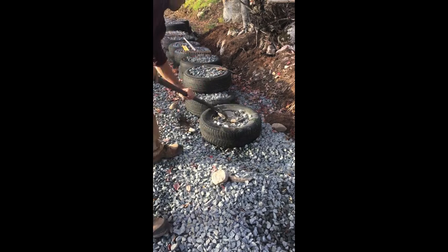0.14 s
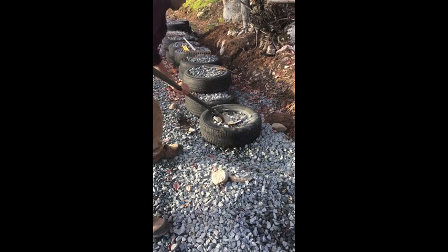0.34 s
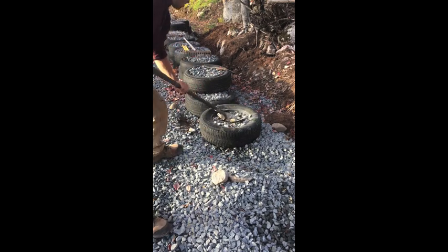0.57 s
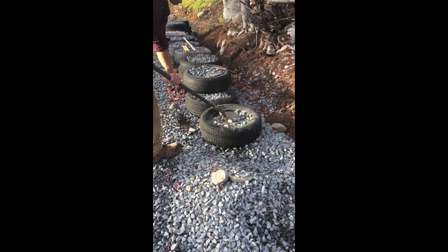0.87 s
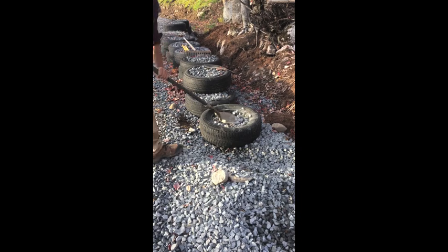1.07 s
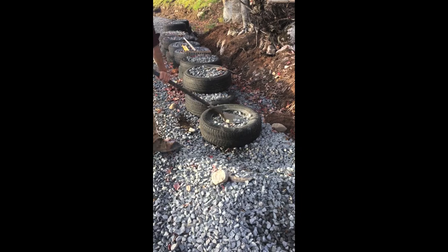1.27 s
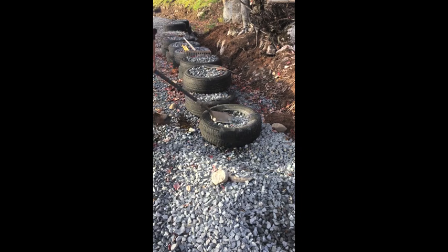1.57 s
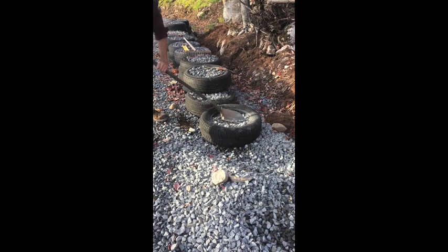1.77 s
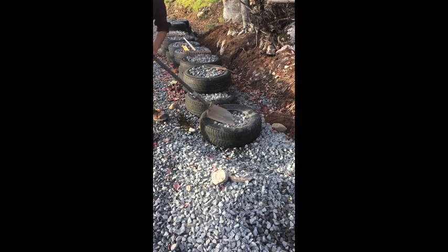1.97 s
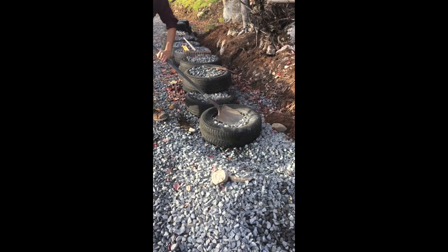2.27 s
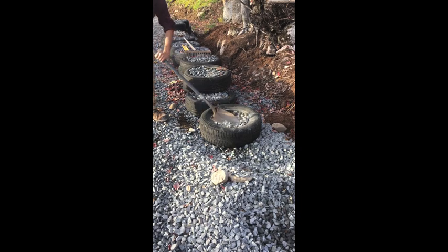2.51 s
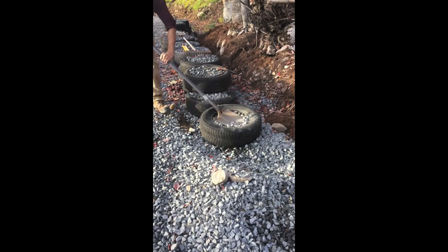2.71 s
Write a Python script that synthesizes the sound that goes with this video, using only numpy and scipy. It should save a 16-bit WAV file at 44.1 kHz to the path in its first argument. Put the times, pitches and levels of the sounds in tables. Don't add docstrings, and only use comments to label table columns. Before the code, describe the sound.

A steel shovel crunches into crushed stone packed in a tire, in uneven pushes with sharp stone cracks, trickling grit, brief metallic ringing and dull rubber thuds; close phone microphone, outdoors, short faint echo.

```python
import sys
import numpy as np
from scipy import signal
from scipy.fft import rfft, irfft, next_fast_len
from scipy.io import wavfile
from scipy.ndimage import uniform_filter1d, map_coordinates

SR = 44100
rng = np.random.default_rng(int(sys.argv[2]) if len(sys.argv) > 2 else 0)


def how_loud(loudness_db):
    steps = np.asarray(loudness_db, float) / 20
    return 10 ** steps


def dump_mix(stems):
    frames = np.atleast_2d(stems).T
    limited = np.clip(frames, -1, 1)
    pcm = np.round(limited * 32767).astype(np.int16)
    wavfile.write(sys.argv[1], SR, pcm)


N = 125685

# time in seconds, ring of the buried pan in dB, boom of the tire in dB.
BLADE_DEPTH = [(0, 0.5, -9), (.2, -1.5, 3), (.4, -8, -14), (.58, 2.5, 1.5), (.75, -12, -6),
               (1.0, -0.5, -1.5), (1.38, 1.5, 3.5), (1.65, 0, -1.5), (1.82, 12, 7), (2.06, 3, -7),
               (2.27, 9, 3.5), (2.5, 7.5, -2), (2.85, 9.5, 8)]


def unit(x):
    return x / np.sqrt(np.mean(x ** 2) + 1e-20)


def along(points, hz):
    f, v = np.transpose(points)
    return np.interp(np.log(hz + 1), np.log(f + 1), v)


def curves(rows):
    s, *cols = np.transpose(rows)
    return [np.interp(np.arange(N) / SR, s, c) for c in cols]


def wobble(rate):
    knots = rng.standard_normal(int(N * rate / SR) + 4)
    return map_coordinates(knots, [np.arange(N) * rate / SR])


def filtered(x, response):
    m = next_fast_len(N + SR // 2)
    return irfft(rfft(x, m) * response(np.fft.rfftfreq(m, 1 / SR)), m)[:N]


def ringing(x, modes):
    def bank(f):
        total = 0
        for k, (center, width, db) in enumerate(modes):
            damping = 1j * f * width
            total = total + (-1) ** k * how_loud(db) * damping / (center * center - f * f + damping)
        return total

    return unit(filtered(x, bank)) * np.sqrt(np.mean(x ** 2))


def noise(spectrum, patchy_db):
    z = signal.stft(rng.standard_normal(N + 512), nperseg=256)[2]
    field = uniform_filter1d(rng.standard_normal(z.shape), 5, 0)
    field = uniform_filter1d(field, 4, 1)
    x = signal.istft(z * how_loud(patchy_db * unit(field)), nperseg=256)[1][:N]
    return unit(filtered(x, lambda hz: how_loud(along(spectrum, hz))))


def open_air():
    # frequency in Hz, level in dB.
    air_spectrum = [(25, 12), (65, 11), (200, 4), (500, -1.5), (1400, -28), (5000, -4), (11000, -4),
                    (16000, -27)]
    return how_loud(-52.5) * noise(air_spectrum, patchy_db=2.5)


def force():
    # time in seconds, level in dB.
    trickle = [(0, -33.5), (.09, -37), (.25, -32.5), (.49, -33.5), (.7, -35), (.83, -34.5), (1.06, -37.5),
               (1.12, -28.5), (1.26, -31.5), (1.3, -40), (1.5, -46), (1.55, -31.5), (1.88, -24.5),
               (1.94, -48), (2.0, -36.5), (2.38, -41), (2.46, -28.5), (2.85, -38)]
    # peak in seconds, rise in seconds, fall in seconds, level in dB.
    pushes = [(.17, 0.037, 0.054, -21.5), (.572, .04, .03, -16), (0.674, 0.015, 0.012, -27),
              (0.794, 0.038, 0.013, -27.5), (0.863, 0.018, 0.014, -19), (.97, 0.064, 0.035, -14.5),
              (1.373, 0.05, 0.049, -20.5), (1.7, 0.097, .04, -30.5), (1.771, 0.017, 0.02, -16),
              (1.86, .03, 0.017, -32), (2.094, 0.042, 0.062, -21.5), (2.268, 0.053, 0.055, -17.5),
              (2.551, 0.039, 0.045, -24), (2.65, 0.049, 0.066, -19), (2.721, 0.027, 0.016, -21.5)]
    # start in seconds, peak in dB, time to fall 60 dB
    # in seconds.
    slips = [(0.1016, -12, 0.1), (0.1384, -13, 0.14), (.2124, -18, 0.28), (0.2675, -11, 0.084),
             (.318, -29, 0.051), (0.338, -15, 0.058), (0.379, -17, 0.052), (0.444, -11, 0.063),
             (0.4496, -7.5, 0.065), (.5048, -34, .04), (0.5216, -8, 0.084), (0.6067, -5.5, 0.038),
             (0.64, -13, 0.1), (0.7209, -12, 0.058), (0.838, -21, .04), (0.85, -9.5, 0.072),
             (0.864, -4.5, 0.063), (0.9508, -20, 0.12), (1.0400, -12, 0.071), (1.077, -12, 0.12),
             (1.102, -10.5, 0.11), (1.31, -14.5, 0.094), (1.3232, -5.5, 0.071), (1.3449, -2.5, 0.13),
             (1.4044, -20, 0.26), (1.4464, -7, 0.1),
             (1.5113, -22.5, 0.029), (1.537, -17, 0.11), (1.659, -10, 0.068), (1.6963, -12.5, 0.064),
                  (1.7424, -7, 0.082), (1.7622, -5, 0.07), (1.8237, -5, 0.071), (1.951, -13.5, 0.12),
                  (2.053, -13.5, 0.043), (2.1975, -5.5, 0.094), (2.3182, -6, 0.12), (2.388, -14.5, 0.11),
                  (2.417, -14.5, 0.055), (2.512, -13.5, 0.054), (2.5483, -8, 0.087), (2.607, -6.5, 0.083),
                  (2.632, -8, 0.091), (2.827, -18, 0.06)]
    slip_db, attack_s = -9.5, 0.00095
    crack_db, crack_t60_s = -1.5, 0.012

    t = np.arange(N) / SR
    power = how_loud(curves(trickle)[0]) ** 2
    for s, rise, fall, db in pushes:
        side = np.where(t < s, rise, fall)
        power = power + how_loud(db) ** 2 * np.exp(-((t - s) / side) ** 2 * 2)
    for s, db, t60 in slips:
        u = np.maximum(t - s, 0)
        dying = how_loud(-60 * u / abs(t60)) + how_loud(crack_db - 60 * u / crack_t60_s)
        power = power + (how_loud(db + slip_db) * dying * (1 - np.exp(-u / attack_s))) ** 2
    return np.sqrt(power) * how_loud(0.96 * wobble(60.04) + 1.0 * wobble(250))


def clicks(push):
    # frequency in Hz, level in dB.
    click_spectrum = [(300, -42), (900, -22), (1500, -11.5), (2400, -7.5), (5300, 2.5), (9500, -4),
                      (14200, -13), (16000, -32)]
    clicks_per_s, life_s = 3500, .002
    brighten_db = 0.62
    spread_db, biggest = 3, 3.5

    n, t = int(clicks_per_s * N / SR), np.arange(360) / SR
    at, u, v, w = rng.random((n, 4)).T
    start = (at * N).astype(int)
    hz = 300 * (16000 / 300) ** (u ** .55)
    strength, octaves = push[start], np.log2(hz / 4000)
    tilt_db = brighten_db * (20 * np.log10(strength) + 22) * octaves
    life = life_s * 4 ** (w - .6) * how_loud(-2 * octaves)
    size_db = spread_db * np.minimum(-np.log(1 - v), biggest)
    size = strength * how_loud(along(click_spectrum, hz) + tilt_db + size_db) / np.sqrt(life)

    rings = size[:, None] * np.sin(2 * np.pi * hz[:, None] * t) * np.exp(-t / life[:, None])
    rings = rings * (1 - np.exp(-2 * t * hz[:, None]))
    rings = rings * np.cos(np.pi / 2 * t / t[-1])
    places = start[:, None] + np.arange(len(t))
    x = np.bincount(places.ravel(), rings.ravel(), N + len(t))[:N]
    return how_loud(-4.5) * unit(x) * np.sqrt(np.mean(push ** 2))


def hiss(push):
    # frequency in Hz, level in dB.
    grit_spectrum = [(300, -56), (800, -27), (1500, -8), (3000, -5), (5160, -2), (9570, -6), (14700, -18),
                     (16300, -31)]
    sizzle_hz, sizzle_grows = 8500, 0.088
    x = noise(grit_spectrum, patchy_db=3)
    top = filtered(x, lambda hz: 1 / (1 + (sizzle_hz / (hz + 1)) ** 4))
    swinging_top = top * (push / how_loud(-27.5)) ** sizzle_grows
    return how_loud(-3.5) * push * (x - top + swinging_top)


def knocks(push):
    return push * rng.standard_normal(N) * how_loud(3.1 * wobble(120))


def blade(push):
    # frequency in Hz, width in Hz, level in dB.
    tip_modes = [(1835, 34, -0.5)]
    # frequency in Hz, width in Hz, level in dB.
    pan_modes = [(1330, 44, -4), (1423.4, 27, 2.5), (1680, 26, -5.5), (766, 77, -11), (2540, 120, -9)]
    # frequency in Hz, width in Hz, level in dB.
    sheet_modes = [(3300, 99, 2), (3706, 70, 3.5), (4000, 45, 0.5), (4930, 35, -11), (5207, 55, 2),
                   (7230, 65, -5.5)]
    pan_db = curves(BLADE_DEPTH)[0]
    tip = how_loud(-24) * ringing(knocks(push), tip_modes)
    pan = how_loud(-19.5 + pan_db) * ringing(knocks(push), pan_modes)
    sheet = how_loud(-12 + 5.45 * wobble(8.22)) * ringing(knocks(push), sheet_modes)
    return tip + pan + sheet


def tire(push):
    # frequency in Hz, width in Hz, level in dB.
    tire_modes = [(203, 28, -8.5), (61, 6.2, -22), (322, 270, -14.5), (640, 267, -10), (1002, 210, -4.5)]
    heavy_grows = 0.28
    tire_db = curves(BLADE_DEPTH)[1]
    slow_push = uniform_filter1d(push, size=SR // 25)
    heavy = knocks(push) * slow_push ** (1 + heavy_grows) / push
    return how_loud(-19 + tire_db) * ringing(heavy, tire_modes) / np.mean(push) ** heavy_grows


def thuds():
    # start in seconds, frequency in Hz, level in dB.
    rubber_knocks = [(.1, 217, -43.5), (.208, 190, -39.5), (.535, 198, -43), (.596, 212, -40),
                     (.85, 211, -46), (.917, 199, -50), (0.967, 211.4, -35), (1.364, 210, -49),
                     (1.392, 198, -42), (1.46, 204, -44), (1.664, 215, -43.5), (1.771, 215, -38),
                     (1.824, 193, -43), (1.857, 203, -39), (2.228, 203, -37), (2.285, 214, -38),
                     (2.564, 211, -39.5), (2.596, 221, -44), (2.634, 217, -43), (2.677, 227, -37),
                     (1.605, 428, -38), (2.462, 516, -43.5)]
    x = np.zeros(N)
    for s, hz, db in rubber_knocks:
        u = np.maximum(np.arange(N) / SR - s, 0) * hz
        x = x + how_loud(db + 8.5) * np.sin(2 * np.pi * u) * np.exp(-u * 3 / 10) * (1 - np.exp(-3 * u))
    return x


def chips():
    # start in seconds, peak in dB, frequency in Hz.
    cracks = [(0.1025, -11, 6100), (0.1392, -9, 3730), (0.1469, -10, 3670), (0.1557, -10, 6300),
              (0.1676, -11, 5300), (0.3397, -17.5, 3700), (0.4513, -11, 5600), (0.5609, -5, 5440),
              (0.5687, 1.5, 7000), (0.5966, -6, 9000), (0.6405, -9.5, 9400), (0.8393, -15, 5500),
              (0.8502, -6, 5700), (0.8654, -10, 4700), (0.8758, -10, 5500), (0.9057, -11, 3300),
              (0.9307, -7, 4600), (0.9391, -1.5, 4800), (0.9499, -6, 5300), (0.9807, -1, 3740),
              (1.0415, -18, 4900), (1.103, -11.5, 6300), (1.3244, -6, 9200), (1.3464, -6, 5850),
              (1.3708, -12, 6100), (1.3844, -8, 3900), (1.4066, -12, 3100), (1.4485, -9.5, 8800),
              (1.4618, -13, 6400), (1.5134, -17, 3400), (1.6972, -9, 3840), (1.7107, -17, 5440),
              (1.7416, -6, 9100), (1.7524, -9, 5700), (1.777, -3, 6300), (1.7833, -2, 5200),
              (1.8001, -19, 5100), (1.8263, -5, 6500), (1.8314, -6, 5140), (1.9516, -11, 2730),
              (2.1979, -8, 5200), (2.2035, -6, 2800), (2.2306, -6, 9400), (2.2509, -4.5, 5700),
              (2.2562, -8, 5300), (2.2778, -9, 5600), (2.2892, -7, 6200), (2.3191, -2, 7160),
              (2.3243, -8, 3840), (2.3917, -13.5, 3550), (2.6117, -5.5, 1750), (2.6502, -6, 3900),
              (2.6606, -11, 5300), (2.6675, -16, 3700), (2.7187, -9, 5060)]
    life_s, snap = 0.00084, 0.37
    x, t = np.zeros(N + SR), np.arange(SR // 100) / SR
    for s, db, hz in cracks:
        burst = uniform_filter1d(rng.standard_normal(len(t)), size=3)
        ring = np.sin(2 * np.pi * hz * t) + snap * burst
        x[round(s * SR):][:len(t)] += how_loud(db - 3.5) * ring * np.exp(-t / life_s)
    return x[:N]


def singing():
    # start in seconds, frequency in Hz, time held in seconds, level in dB.
    songs = [(.185, 1813, 0.016, -34.5), (.27, 1835, 0.019, -33), (2.5, 1398, .1, -46),
             (.378, 1835, 0.015, -36.5), (0.521, 1780, 0.03, -32), (.57, 1680, .05, -37),
             (.67, 1703, 0.027, -43), (.74, 1443, .08, -54), (.863, 1530, 0.012, -32),
             (.92, 3285, 0.02, -27.5), (.96, 1480, 0.022, -32), (.99, 1835, 0.061, -37.5),
             (1.06, 1835, 0.054, -38), (1.325, 984, 0.067, -36), (1.35, 1834, 0.014, -27),
             (1.54, 1950, 0.038, -40), (1.632, 1420, 0.038, -35), (1.771, 1427, 0.055, -29),
             (1.808, 1417, .015, -36), (2.027, 1400, 0.035, -31), (2.109, 1380, 0.021, -34.5),
             (2.24, 1406, 0.041, -29), (2.325, 1837, 0.028, -38), (2.418, 1441, 0.094, -39.5),
             (2.54, 1720, 0.014, -29), (2.629, 1410, 0.017, -30), (2.711, 1863, 0.018, -31.5),
             (2.76, 1390, 0.056, -44.5)]
    t60_s, attack_s, waver = .17, .005, .005
    x, t = np.zeros(N + SR), np.arange(SR // 2) / SR
    wavering_clock = np.cumsum(1 + waver * wobble(80)) / SR
    for s, hz, held, db in songs:
        shape = how_loud(db + 2 - 60 * np.maximum(t - held, 0) / t60_s) * (1 - np.exp(-t / attack_s))
        steady = hz > 1800 and hz < 1860
        clock = s + t if steady else np.interp(s + t, np.arange(N) / SR, wavering_clock)
        x[round(s * SR):][:len(t)] += shape * np.sin(2 * np.pi * hz * clock)
    return x[:N] * how_loud(1.9 * wobble(50))


def echoes(x):
    t60_s, dull_hz = 0.095, 5000
    t = np.arange(SR // 5) / SR
    scatter = rng.standard_normal(len(t)) * how_loud(-60 * t / t60_s)
    scatter = np.pad(scatter, (80, 0))
    tail = filtered(scatter, lambda hz: 1 / (1 + 1j * hz / dull_hz))[:len(t)]
    return how_loud(-13.5) * signal.fftconvolve(x, tail / np.linalg.norm(tail))[:N]


def scene():
    push = force()
    stones = clicks(push) + hiss(push) + chips()
    steel = blade(push) + singing()
    rubber = tire(push) + thuds()
    near = stones + steel + rubber
    return (near + echoes(near) + open_air())[None]


def roll_off(x):
    return signal.sosfilt(signal.butter(12, 16460, fs=SR, output="sos"), x)


def record(dry):
    ceiling, low_cut_hz, top_hz = .66, 55, 15900
    x = dry[0] / (1 + np.abs(dry[0] / ceiling) ** 4) ** .25
    x = filtered(x, lambda hz: (1j * hz / (low_cut_hz + 1j * hz)) ** 2 * (hz < top_hz))
    return roll_off(x[None])


dry = scene()
out = record(dry)
dump_mix(out)
```